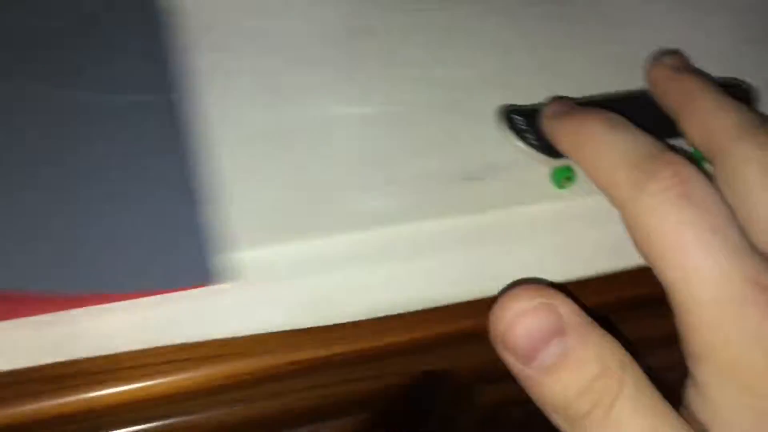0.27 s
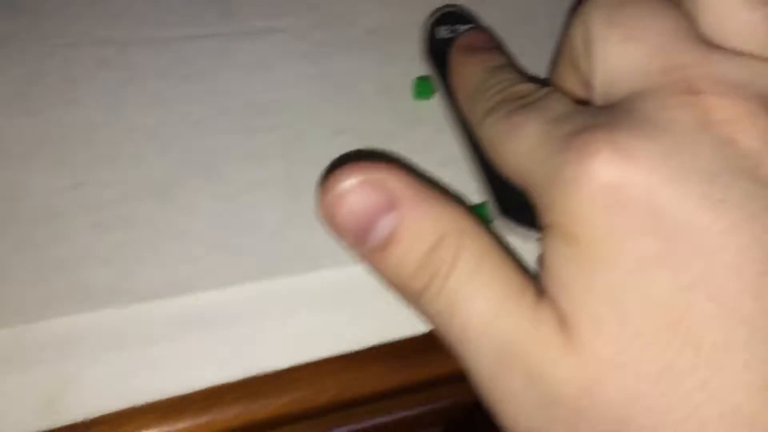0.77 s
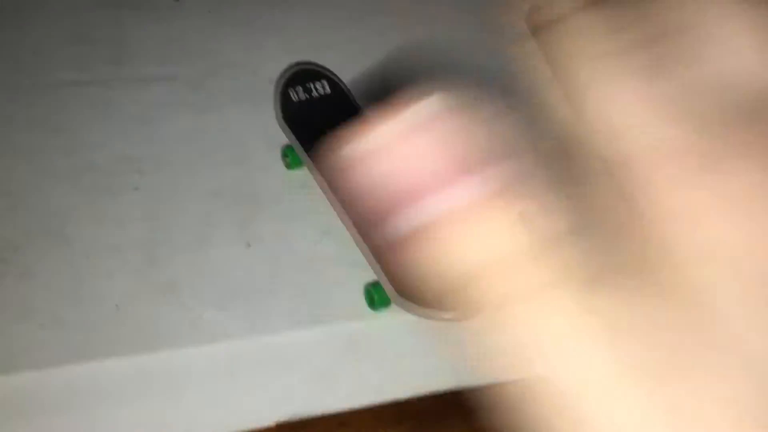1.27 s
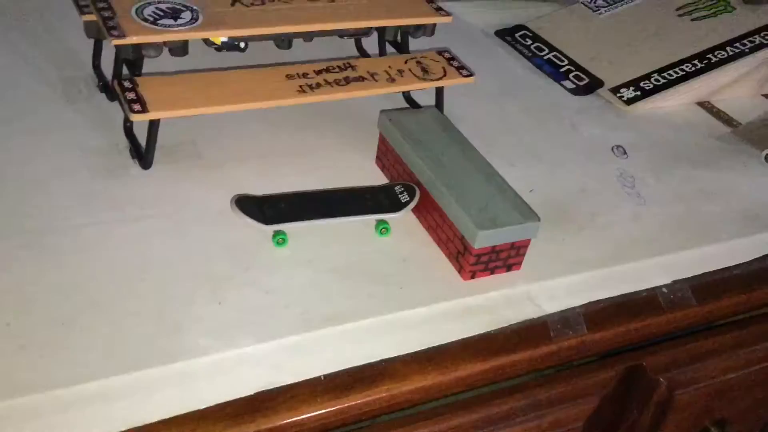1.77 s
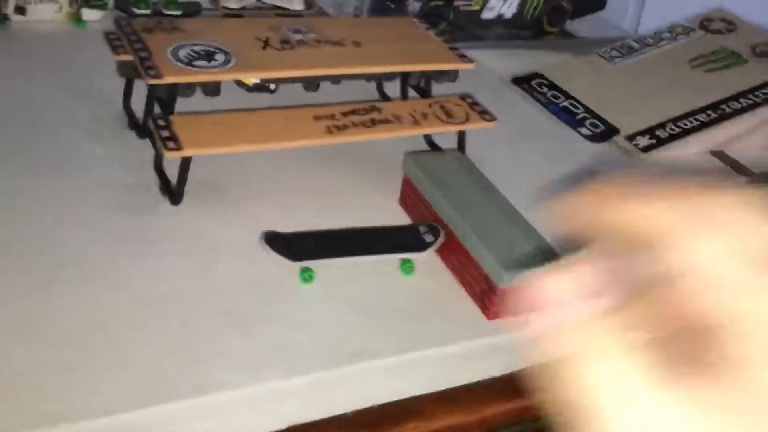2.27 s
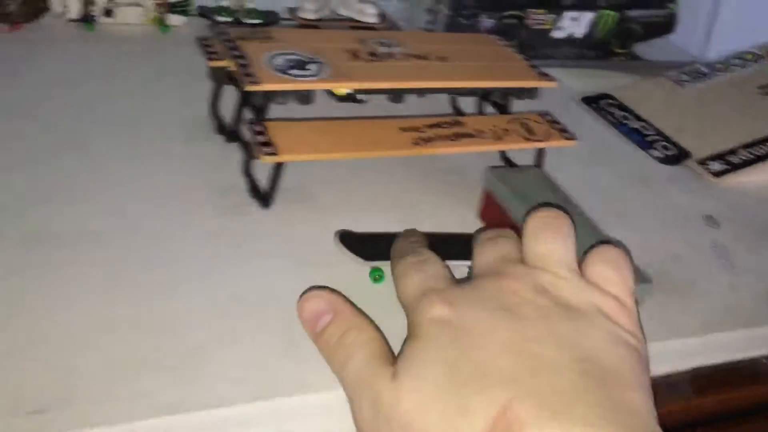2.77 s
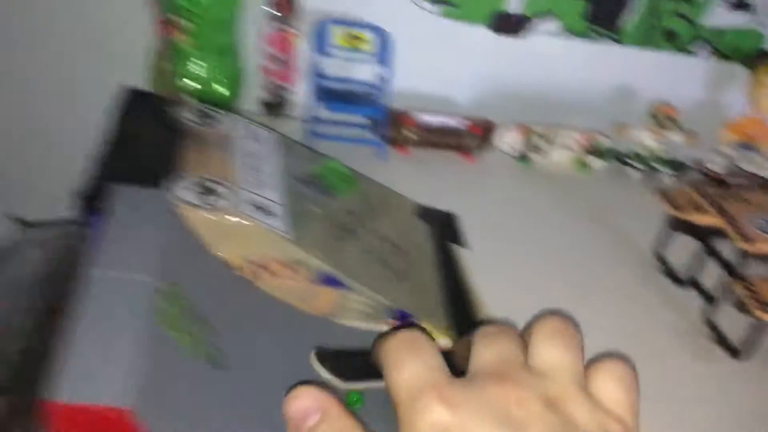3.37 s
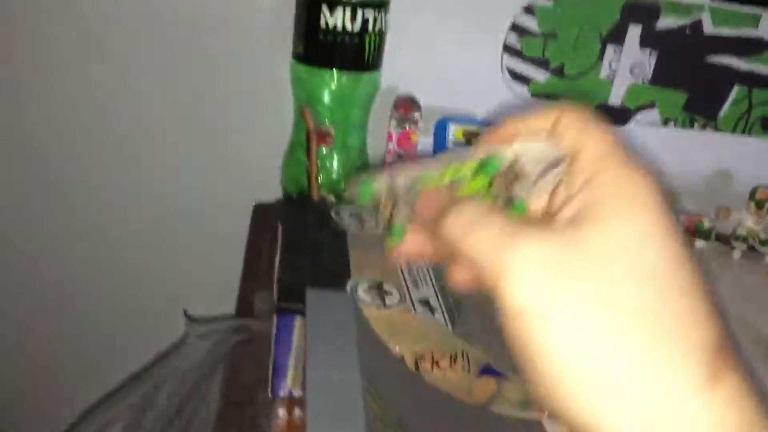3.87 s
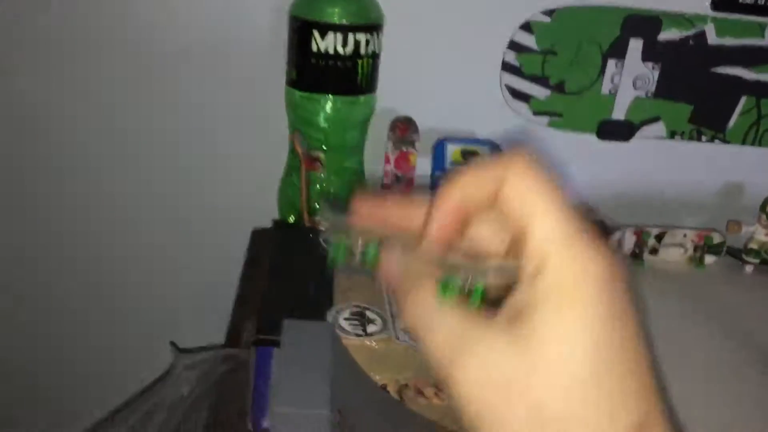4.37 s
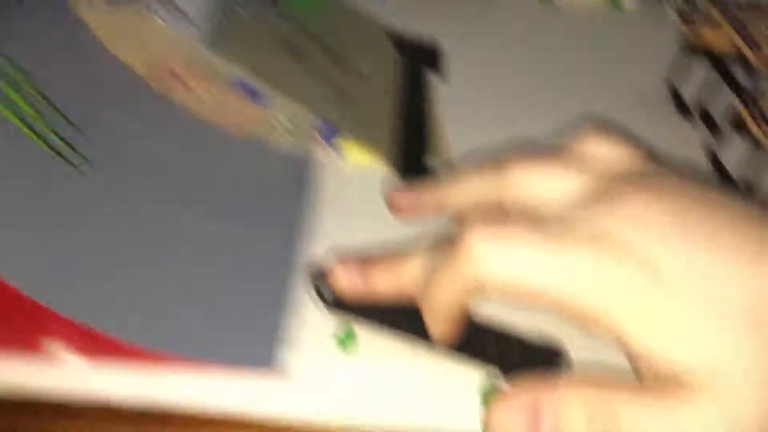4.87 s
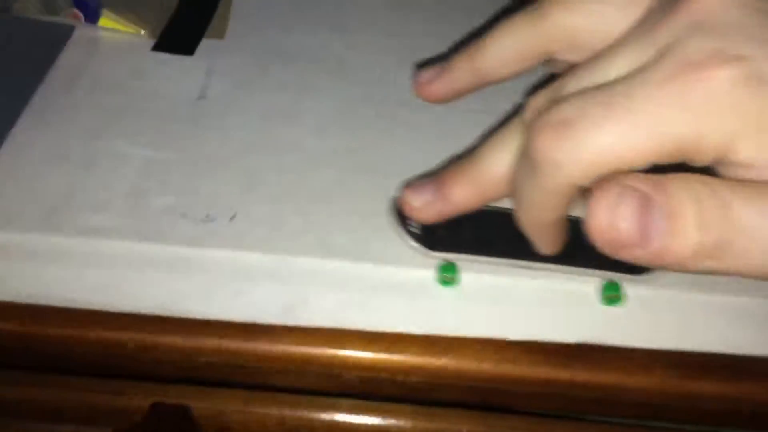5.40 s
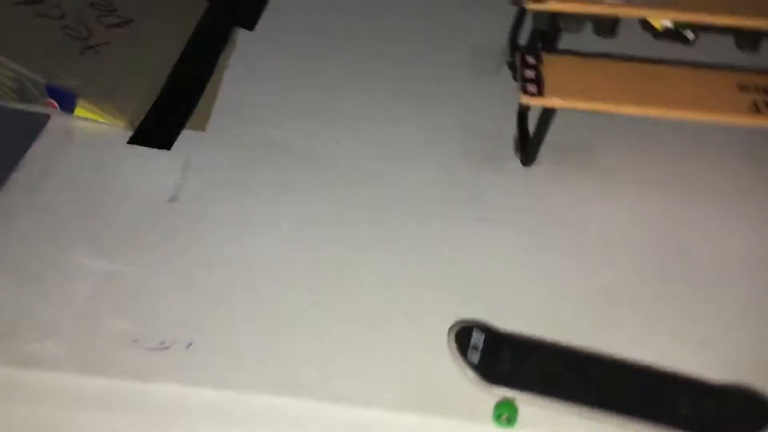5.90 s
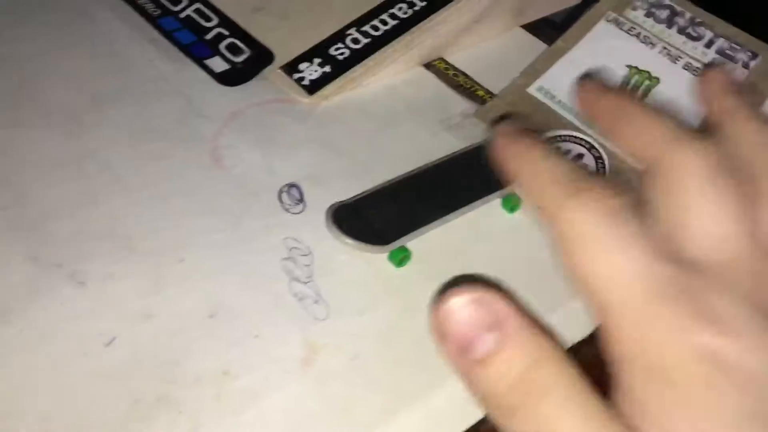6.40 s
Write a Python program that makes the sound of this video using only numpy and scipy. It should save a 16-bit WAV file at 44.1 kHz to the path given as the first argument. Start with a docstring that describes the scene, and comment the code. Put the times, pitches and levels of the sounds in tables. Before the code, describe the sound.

Close by, small fingerboard wheels roll and clatter over a table and toy ramp, with clicking pops, landings and soft finger scuffs.

```python
"""A light tap, then a fingerboard's small wheels rattle across a wooden tabletop, close by.
Grit shakes the deck, trucks and loose axles; seams, pops and landings knock the same parts.
The board rides a hollow card ramp twice, louder, its lifted wheels spinning down in between.
Fingers scuff and tap, the table drones low, and a small room answers."""
import sys
import numpy as np
from scipy import signal
from scipy.fft import rfft, irfft
from scipy.io import wavfile
from scipy.ndimage import uniform_filter1d

SR = 44100
rng = np.random.default_rng(int(sys.argv[2]) if len(sys.argv) > 2 else 0)


def inscribe(sig):
    """Save sig as 16-bit PCM at rate SR to the path in sys.argv[1].

    A 1-D sig is mono; a 2-D sig holds one channel per row.
    Samples are clipped to [-1, 1] before scaling.
    """
    pcm = np.round(np.clip(np.atleast_2d(sig).T, -1, 1) * 32767)
    wavfile.write(sys.argv[1], SR, pcm.astype(np.int16))


N = 292824
T = np.arange(N) / SR

# Fader curves, one list per roll: t/s, deck/dB, axles/dB, trucks/dB, surface/dB, table/dB
ROLLS = [
    [(0.0, -37.5, -47, -39.5, -43.5, -66), (0.034, -46.5, -52, -50.5, -49.5, -70),
     (0.046, -38, -43, -58, -34.5, -85), (0.088, -55.5, -57.5, -56.5, -48.5, -57),
     (0.34, -56, -59.5, -53, -52, -51), (0.41, -54, -54, -48, -60, -53.5),
     (0.452, -47.5, -49.5, -43, -47.5, -74.5), (0.486, -38.5, -25.5, -39, -46.5, -69.5),
     (0.506, -42.5, -38, -38, -41, -66.5), (0.644, -44, -53, -54.5, -57, -67),
     (0.676, -52.5, -58, -57, -56.5, -62), (0.738, -47, -51.5, -54, -62, -76),
     (0.844, -58, -62, -63, -63, -70), (0.92, -85, -100, -94, -65, -73)],
    [(2.77, -95, -100, -102, -77, -74), (2.79, -58, -57, -59, -58, -62),
     (2.868, -61.5, -85, -79, -51.5, -56.5), (2.974, -53.5, -67.5, -59.5, -55.5, -45),
     (3.156, -45.5, -51, -54, -50, -45), (3.382, -41.5, -56, -45, -40, -49),
     (3.392, -33, -46, -39, -43, -40.5), (3.472, -30, -39.5, -30.5, -38, -52),
     (3.498, -23.5, -45.5, -33.5, -41, -53.5), (3.506, -24.5, -37, -27.5, -29, -37),
     (3.554, -21.5, -40.5, -28, -35, -55), (3.604, -22.5, -39, -30.5, -31, -63.5),
     (3.626, -19.5, -41, -28, -41, -62.5), (3.646, -16, -34.5, -23, -33.5, -57.5),
     (3.69, -18, -41, -26.5, -36, -62), (3.716, -16.5, -31.5, -22, -20, -59),
     (3.732, -20.5, -34.5, -20.5, -31.5, -58.5), (3.758, -27.5, -41, -26.5, -37.5, -58),
     (3.78, -23, -30.5, -28, -37, -52.5), (3.8, -33, -45, -37.5, -53, -62),
     (3.86, -50, -55, -57, -58, -57.5), (4.0, -59, -67, -62.5, -65, -57.5),
     (4.2, -79.5, -89, -85.5, -81, -65), (4.244, -99, -101, -99, -78, -70),
     (4.3, -88, -109, -114, -77, -65)],
    [(4.505, -24.5, -17, -13.5, -34, -54.5), (4.517, -19, -23.5, -17, -36.5, -51),
     (4.523, -27, -31.5, -30, -38.5, -47), (4.529, -29.5, -33.5, -29, -39.5, -46.5),
     (4.533, -12, -24.5, -18.5, -32.5, -43), (4.539, -23, -21.5, -21, -33.5, -39.5),
     (4.549, -22, -36, -28, -35.5, -41), (4.577, -14, -34.5, -19.5, -45.5, -52.5),
     (4.598, -21, -45.5, -29.5, -43, -46.5), (4.607, -22.5, -37, -18.5, -32, -41),
     (4.623, -20, -37, -23, -29.5, -44.5), (4.643, -16, -42.5, -17.5, -30.5, -47.5),
     (4.665, -20, -42, -31.5, -22, -47), (4.691, -30, -49, -28.5, -40.5, -62),
     (4.697, -28.5, -43.5, -34, -37, -49), (4.725, -27.5, -50, -34.5, -40, -44.5),
     (4.803, -46.5, -56.5, -47.5, -47.5, -55), (4.835, -39, -50, -41.5, -46, -43.5),
     (4.855, -43, -58, -52, -45, -40.5), (4.865, -32, -40, -32.5, -52, -51),
     (4.877, -41, -54, -46, -59, -46), (4.905, -44.5, -56.5, -54, -55, -53.5),
     (5.009, -55, -61, -51, -57, -50.5), (5.347, -53, -56, -50.5, -60.5, -55.5),
     (5.501, -62, -80, -64.5, -65, -61), (5.585, -70, -83.5, -68, -68, -62.5),
     (5.633, -74, -89, -82, -77, -63), (5.66, -69, -72, -61, -81, -59)],
]
# How loosely the axles tick, one row per roll: trim/dB
LOOSENESS = [(-5.5,), (-8.5,), (0.87,)]
# Rides on the ramp: start/s, end/s
ON_RAMP = [(3.422, 3.8), (4.5, 4.8)]
# Fingers and board scuff the table: peak/s, rise/s, fall/s, deck/dB, axles/dB, trucks/dB
SCUFFS = [(1.249, 0.077, 0.1, -44, -46.5, -39.5), (1.46, 0.12, .15, -93, -72, -100),
          (1.626, 0.019, 0.13, -46, -50, -39), (1.753, 0.012, .13, -60, -74, -70),
          (2.03, 0.26, 0.041, -66, -85, -101), (5.682, 0.083, 0.073, -57.5, -65, -65.5),
          (5.88, 0.23, 0.25, -83, -77.5, -100), (6.2, 0.14, 0.16, -58.5, -79, -74),
          (6.309, 0.17, 0.26, -52, -74.5, -66), (6.62, 0.027, .8, -47, -60, -49)]
# Seams, pops and landings: t/s, trucks/dB, axles/dB re trucks
KNOCKS = [(0.067, -50, 9.5), (0.077, -40.5, 7), (0.116, -41.5, 2.5), (0.303, -42.5, -1), (0.386, -40, -0.5),
          (0.442, -28.5, -12), (0.4672, -33, 6.5), (0.4821, -21, 4), (0.4987, -31.5, 3), (0.526, -39, -11),
          (1.2327, -34, 3), (1.2553, -29, -0.5), (1.2943, -40, -12), (1.6206, -41, -1.5), (2.7886, -52, 5),
          (2.9814, -47, 4), (3.107, -46, 6), (3.1403, -33.5, 0.5), (3.3939, -13.5, -13.5),
          (3.4221, -16, -9.5), (3.509, -14, -0.5), (3.6386, -12.5, -22), (3.7261, -10, -19.5),
          (3.7767, -11, -3), (3.92, -58.5, 11.5), (3.9496, -43.5, 1), (4.5048, -5, -19.5),
          (4.5141, -2.5, -8), (4.5296, -2, -9), (4.5359, -5.5, -5.5), (4.551, -13.5, -10),
          (4.566, -13.5, -14.5), (4.5735, -15, -10.5), (4.601, -11, -18), (4.6079, -4.5, -4),
          (4.6399, -12.5, -8.5), (4.6995, -21.5, -6.5), (4.8301, -25, -13), (4.8632, -25.5, 2.5),
          (5.095, -35.5, -0.5), (5.3502, -30.5, -23), (5.674, -44.5, -15), (5.6875, -42.5, -9),
          (6.6169, -38, -12)]
# Duller blows: finger taps on the surface and deck-heavy knocks on the ramp: t/s, thud/dB, deck/dB re thud,
# trucks/dB re thud, thud f/Hz
TAPS = [(0.0424, -31, 4.5, 1, 457), (1.7541, -53, 19, 21.5, 407), (1.939, -38.5, -22, -42, 528),
        (1.986, -41, -12, -27, 650), (2.0325, -39.5, -28, -27, 758), (2.8114, -35, -26, -17, 420),
        (3.4955, -30.5, 24, 14.5, 449), (3.664, -31, 20.5, 11.5, 486), (4.581, -30, 20.5, 12.5, 500),
        (4.627, -27, 29, 9, 446.6), (4.65, -33, 15, -3, 448), (5.469, -66, 26, 10, 399.5),
        (6.1343, -42.5, -17, -32, 319), (6.1995, -40, 11, 12.5, 240), (6.2325, -29.5, -6.5, -14, 353)]
# The clearest axle ticks: t/s, level/dB, top ring/dB re level
CLEAR_TICKS = [(0.483, -14.5, 10), (1.2114, -27, 8), (1.2148, -28, 10), (1.2656, -35, 7),
               (1.7654, -50, -33), (3.999, -47, 2), (4.145, -62, 8), (4.207, -68, 5), (4.8094, -40, -10),
               (4.8174, -42, -21), (4.8364, -31, -2), (4.879, -38, -19), (4.8864, -42, -12),
               (4.903, -44, -19), (4.9116, -26.5, -11), (4.9188, -36.5, 11), (4.9394, -52, -17),
               (4.9646, -51, -12), (4.981, -38, -10), (4.988, -30, -4), (4.9994, -35, -19),
               (5.0107, -40, -20), (5.027, -33, -6), (5.0324, -45, -16), (5.059, -38, -15),
               (5.0834, -42, -10), (5.101, -34, -22), (5.1256, -41, -22), (5.1362, -31, -28),
               (5.1452, -25.5, -26), (5.1561, -31, -23), (5.182, -31, -24)]
# Resonances of each part: f/Hz, width/Hz, level/dB
DECK_ON_TABLE = [(705, 490, -4), (949, 56, 2), (1162, 370, -5.5), (1516, 110, 0), (1820, 430, -4)]
DECK_ON_RAMP = [(858, 77, -4), (1022, 190, -8.5), (1302, 73, -6.5), (1462.6, 58, -0.5), (1645, 98, 1),
                (1760, 37, -2.5), (1896, 180, -7.5), (2092, 49, -9)]
TRUCKS = [(2250, 430, 3.5), (3060, 500, -3.5), (3460, 530, 1.5), (3861, 210, 3), (4250, 200, 3),
          (4740, 710, -15.5)]
TRUCKS_ON_RAMP = [(2280, 150, 3), (2591, 94, 3.5), (2856, 380, 3), (3380, 150, -2.5), (3510, 110, -2),
                  (3940, 140, -5), (4250, 140, -8.5), (5100, 580, -13)]
TRUCKS_FREE = [(2340, 1100, -4.5), (3450, 460, 4), (4460, 560, -3.5), (5400, 1300, -4.5)]  # no finger on the deck
AXLES = [(5980, 820, 2), (6810, 640, 4), (8130, 1700, 3), (9970, 2500, -4), (11800, 1700, 1),
         (14600, 2900, -6)]
SURFACE = [(335, 70, 1), (420, 77, 0.5), (540, 42, -5), (586, 91, -5)]  # tabletop under the wheels
RAMP = [(313, 130, -11), (475, 49, -2), (586, 84, 1)]
SNAP = [(12800, 1700, 0.00027), (14800, 1600, 0.0012)]  # bright edge of a knock
TICK = [(2440, 160, -7.5), (3820, 1200, 6.5), (6830, 1500, -0.5), (9140, 700, -6.5)]  # loose axle
TICK_TOP = [(11870, 1500, -2), (13600, 1400, -3)]
SPIN = [(3116, 170, 6.5), (3824, 190, 1), (5400, 287, 3.5), (13100, 1000, -13)]  # lifted wheels
SING = [(600, 47, -3.5), (959, 50, 0)]  # coasting wheel
TABLE = [(162, 58, -7), (193, 49, -0.5), (270, 110, -4)]  # the tabletop's lowest modes
HUM = [(165, 57, -6.5), (192, 18, -1.5), (203, 15.8, 4.5), (235, 190, -18)]
# Colour of the room tone: f/Hz, relative level/dB
ROOM = [(24, -82.5), (40, -52.5), (112, -17), (417, -4.5), (461, 2), (497, -21.5), (656, -24.5), (744, -16),
        (844, -36.5), (4340, -47.5), (5580, -39.5), (8360, -41), (16500, -45.5)]

ROLL_TRIM_DB, KNOCK_TRIM_DB, TICK_TRIM_DB = -0.5, -6.5, -2
WANDER_DB, WANDERS_PER_S = 0.9, 14  # each resonance swells and fades as the wheels move on
STOPS_S = [1.855, 6.355]  # scuffs and echo stop dead here; the hum ends at the first
SILENT_DB = -130


def rolling(grit_db=3.0, bump_db=0.68, bumps_per_s=130):
    """Grit of uneven size, bunched by bumps, shakes all the parts at once; scuffs swell on top."""
    grains = rng.standard_normal(N)
    size_db = grit_db * np.minimum(rng.exponential(size=N), 5.5)
    shake = unit(grains * undb(size_db + bump_db * walk(bumps_per_s)))
    deck = undb(scuffed(fader(1), part=0)) * riding(shake, DECK_ON_TABLE, DECK_ON_RAMP)
    axles = undb(scuffed(fader(2), part=1)) * unit(ring(shake, AXLES, WANDER_DB))
    trucks = undb(fader(3)) * riding(shake, TRUCKS, TRUCKS_ON_RAMP)
    free_trucks = undb(scuffed(SILENT_DB, part=2)) * unit(ring(shake, TRUCKS_FREE, WANDER_DB))
    surface = undb(fader(4)) * riding(shake, SURFACE, RAMP)
    return undb(ROLL_TRIM_DB) * (deck + axles + trucks + free_trucks + surface)


def riding(shake, table_modes, ramp_modes):
    """A part rings with whatever the board stands on, crossfading between table and ramp."""
    ramp = uniform_filter1d(sum(gate(start, end) for start, end in ON_RAMP), size=1500)
    on_table = unit(ring(shake, table_modes, WANDER_DB))
    on_ramp = unit(ring(shake, ramp_modes, WANDER_DB))
    return on_table * (1 - ramp) + on_ramp * ramp


def scuffed(base_db, part, drop_db=40):
    """Each scuff pushes a part's level up and lets it fall (part 0 deck, 1 axles, 2 trucks)."""
    level_db = np.full(N, base_db, dtype=float)
    for peak_s, rise_s, fall_s, *peaks_db in SCUFFS:
        start, end = peak_s - rise_s, peak_s + fall_s
        stop = min([end] + [s for s in STOPS_S if s > peak_s])
        span = slice(int(start * SR), int(stop * SR))
        swell_db = peaks_db[part] - np.interp(T[span], [start, peak_s, end], [drop_db, 0, drop_db])
        level_db[span] = np.maximum(level_db[span], swell_db)
    return level_db


def knocks(snap_db=-4.5, snap_slope=2.7, surface_db=-25):
    """Seams, pops and landings hit the trucks; on the hollow ramp the deck answers louder."""
    blows = []
    for s, db, axles in KNOCKS:
        deck = -2 if any(start < s < end for start, end in ON_RAMP) else -15
        snap = snap_db + snap_slope * axles
        blows.append((s, db, db + deck, db + axles, db + snap, db + surface_db))
    return strike(blows, t60_s=0.025)


def taps(axles_db=-18.5, snap_db=-50):
    """Taps on the surface and duller knocks on the ramp jog the deck and trucks, with little top end."""
    blows = [(s, db + trucks, db + deck, db + trucks + axles_db, db + trucks + snap_db)
             for s, db, deck, trucks, _ in TAPS]
    return strike(blows, t60_s=0.022)


def strike(blows, t60_s, click_gain=7.5, finger_damping=3.6):
    """Each blow is a click and a short rattle. Rows: t/s, then level/dB for each part struck."""
    rattle = rng.standard_normal(N)
    t = np.arange(SR // 10) / SR
    fade = undb(-60 * t / t60_s)
    # Pressing fingers widen the deck's resonances.
    pressed_deck = [(hz, finger_damping * width, db) for hz, width, db in DECK_ON_RAMP]
    parts = (TRUCKS, pressed_deck, AXLES, SNAP, SURFACE)
    times, *levels = zip(*blows)
    out = 0
    for modes, part_db in zip(parts, levels):
        envelope = place((s, undb(db) * fade) for s, db in zip(times, part_db))
        click = click_gain * np.maximum(np.diff(envelope, prepend=0), 0)
        # A wide resonance needs less drive than a narrow one for the same peak.
        response = ring(signal.unit_impulse(300), modes) ** 2
        power = click_gain ** 2 * response + np.convolve(response, fade[:300] ** 2)[:300]
        out += ring(envelope * rattle + click, modes, wander_db=0.6) / (2 * np.sqrt(power.mean()))
    return undb(KNOCK_TRIM_DB) * out


def thuds(rise_cycles=0.3, t60_cycles=12):
    """Under each dull blow the surface swings a few times and is quickly damped."""
    events = []
    for s, db, _, _, hz in TAPS:
        cycles = hz * np.arange(SR // 10) / SR
        envelope = undb(db - 60 * cycles / t60_cycles) * np.minimum(cycles / rise_cycles, 1)
        events.append((s, envelope * np.sin(2 * np.pi * cycles)))
    return place(events)


def axle_ticks(ticks_per_s=130, spread_db=4.5, whirr=0.03):
    """Loose axles tick: small random ticks over a steady whirr, and the clearest one by one."""
    hits = (rng.random(N) < ticks_per_s / SR) * undb(spread_db * np.minimum(rng.exponential(size=N), 2))
    chatter = unit(ring(hits + whirr * rng.standard_normal(N), TICK))
    loose_db = sum(db * gate(roll[0][0], roll[-1][0]) for (db,), roll in zip(LOOSENESS, ROLLS))
    out = undb(fader(2) + TICK_TRIM_DB + loose_db) * chatter
    times, tick_db, top_db = np.array(CLEAR_TICKS).T
    for modes, db in ((TICK, tick_db), (TICK_TOP, tick_db + top_db)):
        clicks = np.zeros(N)
        clicks[(times * SR).astype(int)] = undb(db)
        peak = np.abs(ring(signal.unit_impulse(999), modes)).max()
        out += ring(clicks, modes) / peak
    return out


def wheel_spin(start_s=3.82, end_s=4.22, start_hz=75, end_hz=30, level_db=-54, fade_db=-17):
    """Lifted wheels tick unevenly on their axles, ever slower and fainter."""
    progress = np.clip((T - start_s) / (end_s - start_s), 0, 1)
    turn_hz = (start_hz + (end_hz - start_hz) * progress) * (1 + 0.15 * walk(30))
    turns = np.cumsum(turn_hz) / SR
    pulses = 0.18 + np.exp(-(turns % 1) / 0.2)
    chatter = pulses * rng.standard_normal(N) * undb(walk(40))
    return unit(ring(chatter, SPIN)) * undb(level_db + fade_db * progress) * gate(start_s, end_s)


def wheel_sing(start_s=0.53, end_s=0.78, level_db=-48):
    """A wheel sings as the board coasts out: a narrow, fluttering tone that swells in and out."""
    swell = uniform_filter1d(gate(start_s, end_s), size=2000)
    return undb(level_db) * swell * unit(ring(rng.standard_normal(N), SING))


def table_drone(idle_db=-70.5):
    """The tabletop's lowest modes rumble under the wheels and idle faintly between rolls."""
    level_db = np.maximum(fader(5), idle_db) + 1.5 * walk(12)
    return undb(level_db) * unit(ring(rng.standard_normal(N), TABLE))


def hum(level_db=-50.5):
    """A low, wavering hum lies under the opening."""
    envelope = undb(level_db + 0.6 * walk(18)) * (T < STOPS_S[0])
    return envelope * unit(ring(rng.standard_normal(N), HUM))


def room_echo(board, level_db=-27, t60_s=0.3, rise_s=0.0033, lowpass_hz=5000):
    """A small room's diffuse tail, dull on top and choked at each stop."""
    t = np.arange(SR // 2) / SR
    tail = rng.standard_normal(len(t)) * undb(-60 * t / t60_s) * np.minimum(t / rise_s, 1)
    tail = signal.lfilter(*signal.butter(1, lowpass_hz, fs=SR), tail)
    stretches = np.split(board, [int(s * SR) for s in STOPS_S])
    wet = [signal.fftconvolve(x, tail)[:len(x)] for x in stretches]
    return undb(level_db) * np.concatenate(wet) / np.linalg.norm(tail)


def room_tone(level_db=-73.5):
    """A faint, dull bed of noise that wavers."""
    hz = np.maximum(np.arange(N // 2 + 1) * SR / N, 1)
    room_hz, room_db = np.array(ROOM).T
    colour = undb(np.interp(np.log(hz), np.log(room_hz), room_db))
    bed = unit(irfft(rfft(rng.standard_normal(N)) * colour, N))
    return bed * undb(level_db + 0.48 * walk(24))


def ring(x, modes, wander_db=0):
    """Sum of steep resonances, each applied twice; neighbours alternate in sign."""
    out = 0
    for k, (hz, width, db) in enumerate(modes):
        b, a = signal.iirpeak(hz, hz / (1.443 * width), SR)
        if wander_db:
            db = db + wander_db * walk(WANDERS_PER_S)
        out += (-1) ** k * undb(db) * signal.lfilter(b, a, signal.lfilter(b, a, x))
    return out


def fader(column):
    """One column of ROLLS as a curve in dB, silent between rolls."""
    level_db = np.full(N, SILENT_DB, dtype=float)
    for roll in map(np.array, ROLLS):
        inside = (T >= roll[0, 0]) & (T <= roll[-1, 0])
        level_db[inside] = np.interp(T[inside], roll[:, 0], roll[:, column])
    return level_db


def walk(steps_per_s):
    """Glides between random values; spread about 2.3."""
    hold = int(SR / steps_per_s)
    steps = np.repeat(rng.standard_normal(N // hold + 1), hold)
    return 2.81 * uniform_filter1d(steps, hold)[:N]


def place(events):
    """Lay (t/s, sound) pairs on one track."""
    track = np.zeros(N)
    for s, sound in events:
        i = int(s * SR)
        track[i:i + len(sound)] += sound[:N - i]
    return track


def gate(start_s, end_s):
    """1 between the two times, else 0."""
    return 1.0 * ((T > start_s) & (T < end_s))


def undb(db):
    """Decibels to gain."""
    return 10 ** (db / 20)


def unit(x):
    """Scale to rms 1."""
    return x / np.sqrt(np.mean(x ** 2))


def scene():
    """Board, table and room in mono."""
    board = rolling() + knocks() + taps() + thuds() + axle_ticks() + wheel_spin() + wheel_sing()
    return (board + room_echo(board) + table_drone() + hum() + room_tone())[None]


def record(dry):
    """The microphone rounds the loudest peaks, thins the deepest bass and cuts the top."""
    drive, low_hz, top_hz = 0.6, 45, 16600
    rounded = np.tanh(drive * dry) / drive
    thin = signal.lfilter(*signal.butter(2, low_hz, "high", fs=SR), rounded)
    return signal.sosfilt(signal.ellip(10, 0.2, 80, top_hz, fs=SR, output="sos"), thin)


dry = scene()
out = record(dry)
inscribe(out)
```